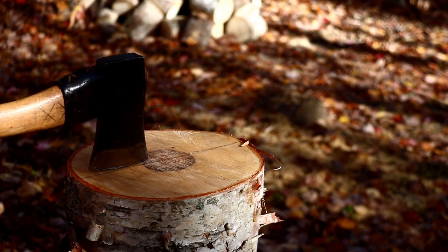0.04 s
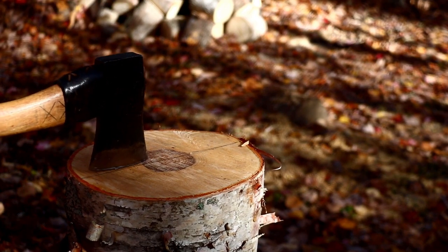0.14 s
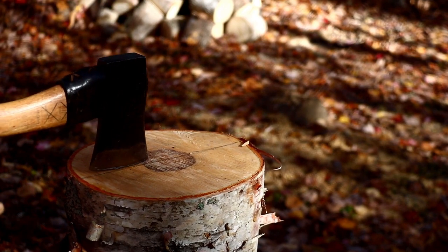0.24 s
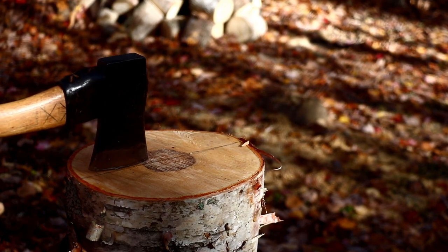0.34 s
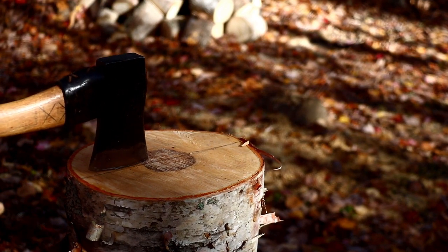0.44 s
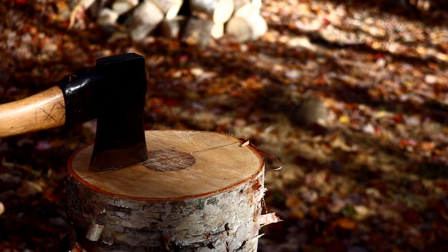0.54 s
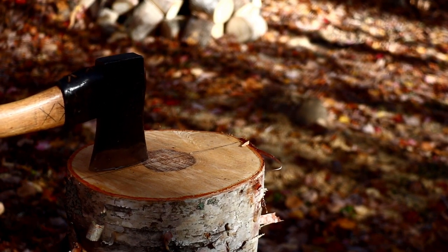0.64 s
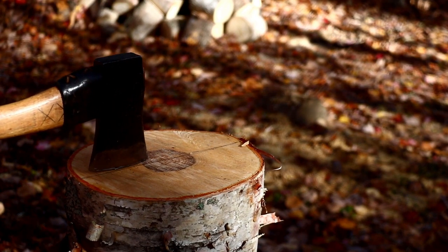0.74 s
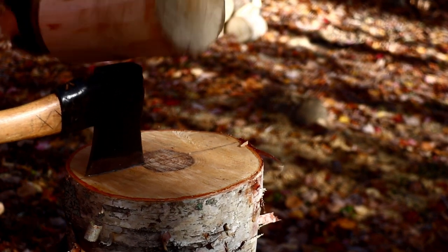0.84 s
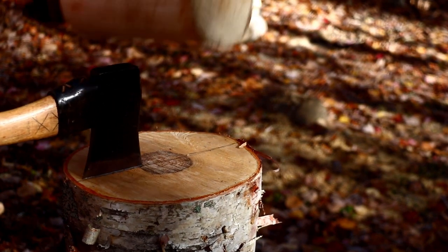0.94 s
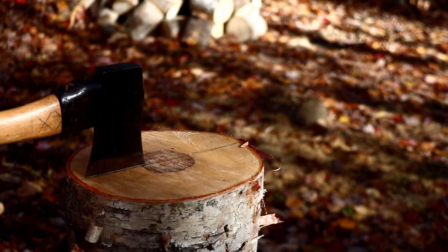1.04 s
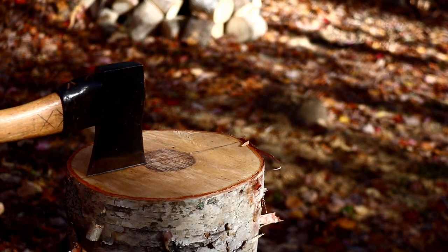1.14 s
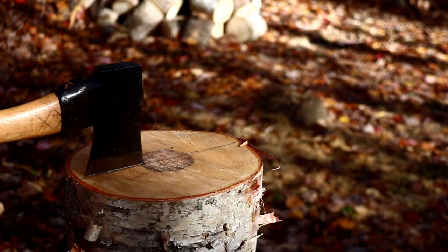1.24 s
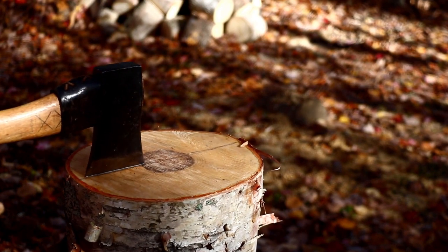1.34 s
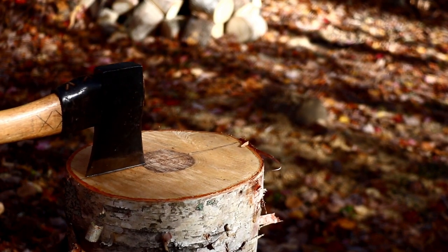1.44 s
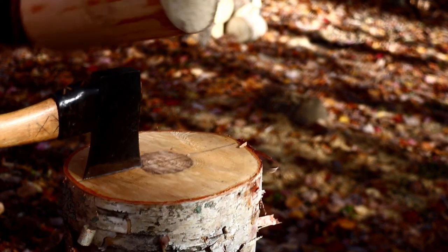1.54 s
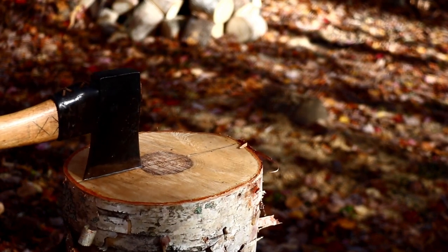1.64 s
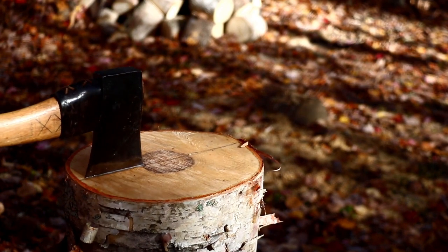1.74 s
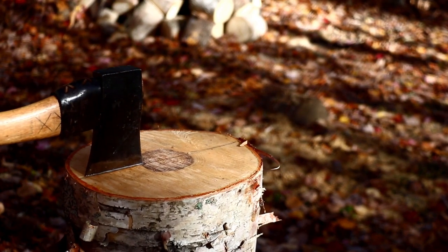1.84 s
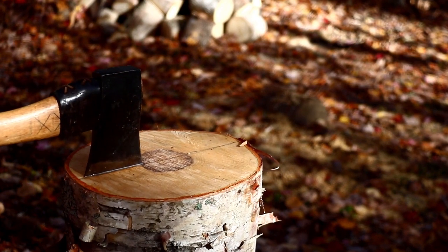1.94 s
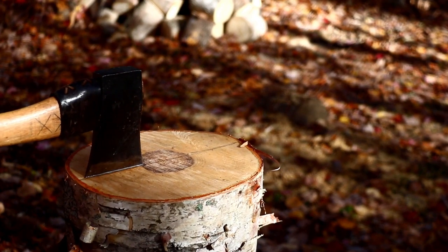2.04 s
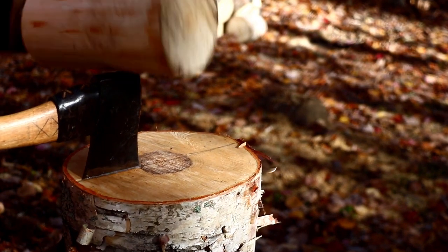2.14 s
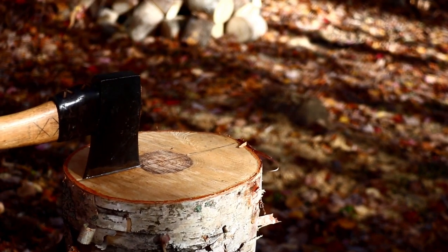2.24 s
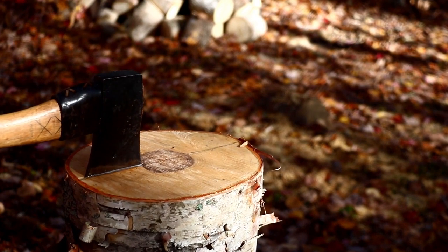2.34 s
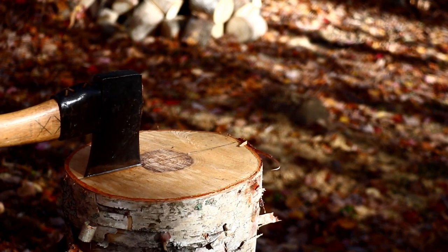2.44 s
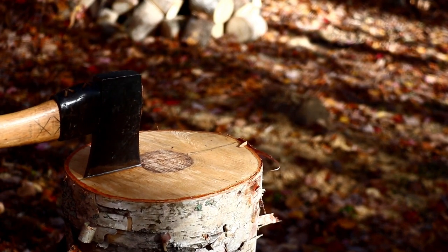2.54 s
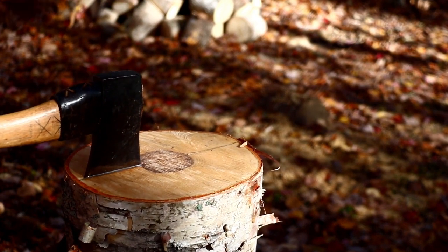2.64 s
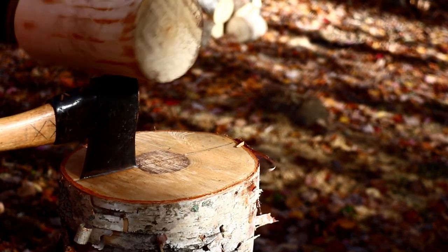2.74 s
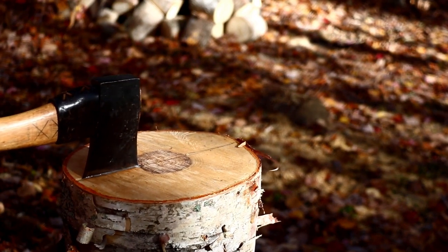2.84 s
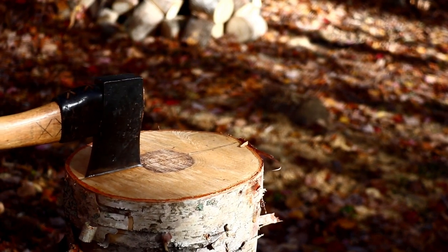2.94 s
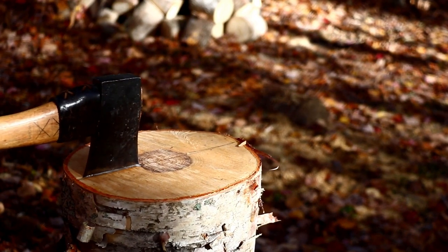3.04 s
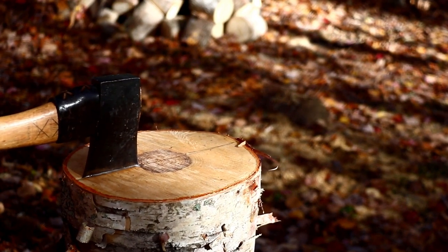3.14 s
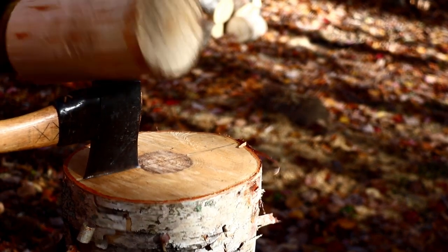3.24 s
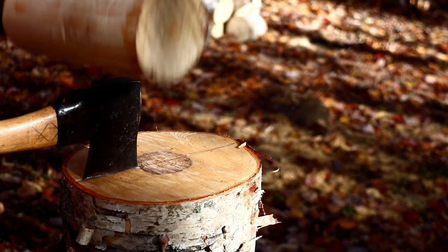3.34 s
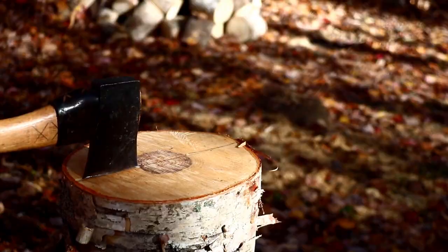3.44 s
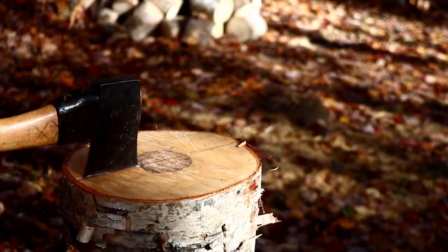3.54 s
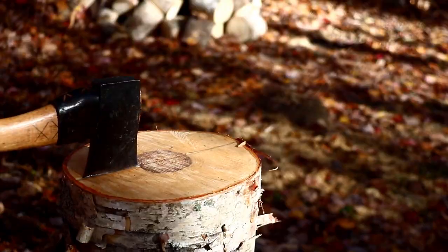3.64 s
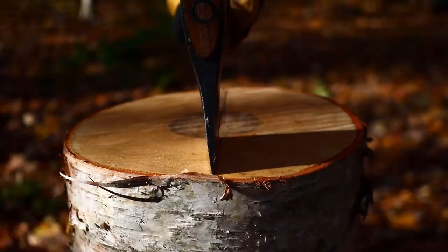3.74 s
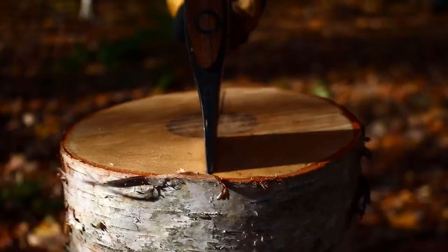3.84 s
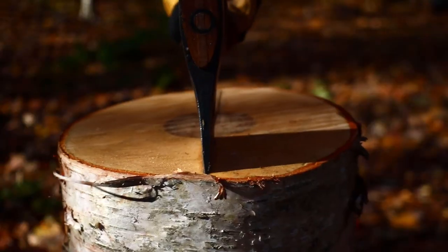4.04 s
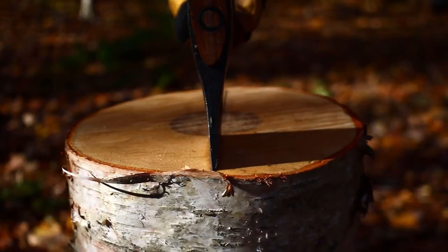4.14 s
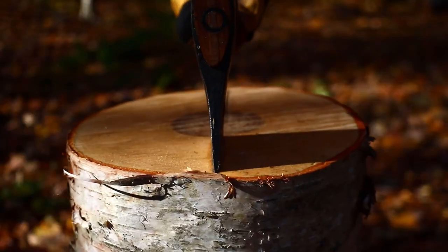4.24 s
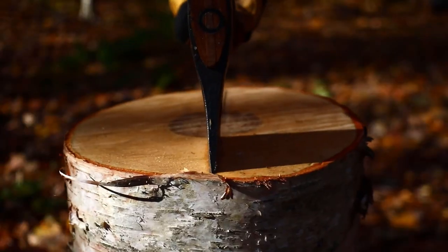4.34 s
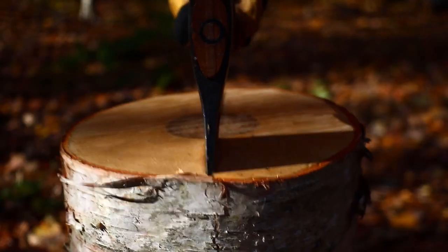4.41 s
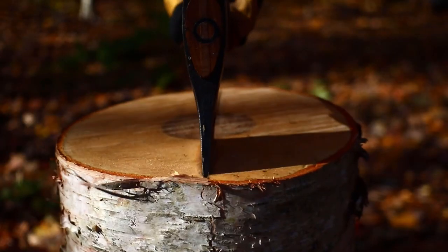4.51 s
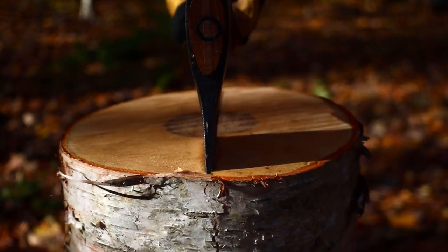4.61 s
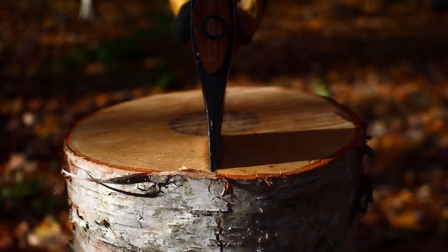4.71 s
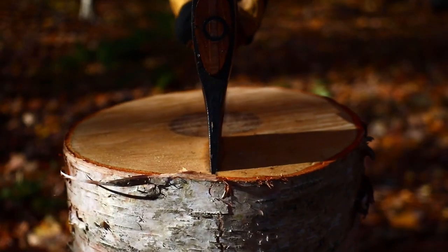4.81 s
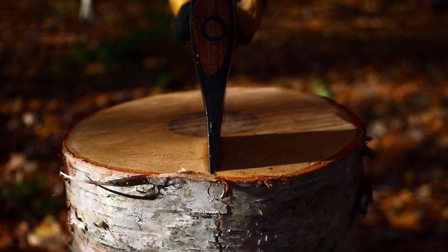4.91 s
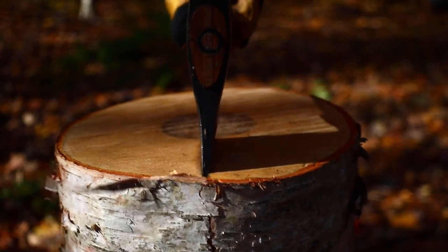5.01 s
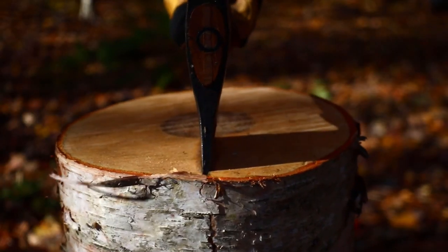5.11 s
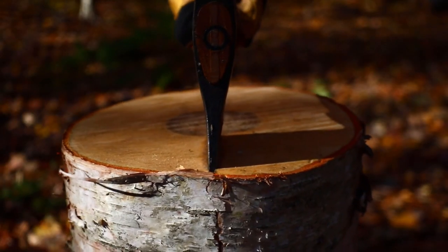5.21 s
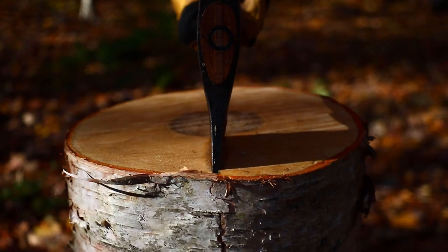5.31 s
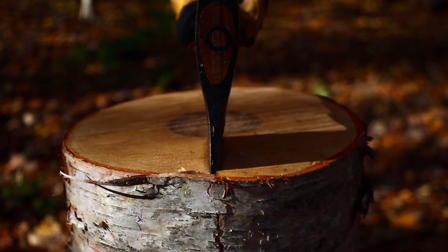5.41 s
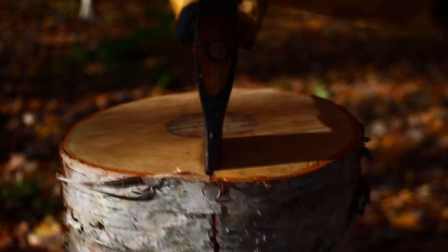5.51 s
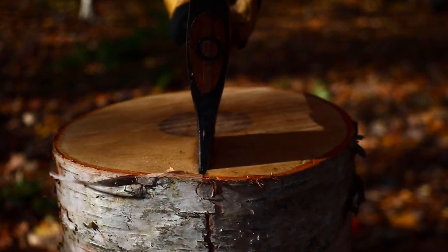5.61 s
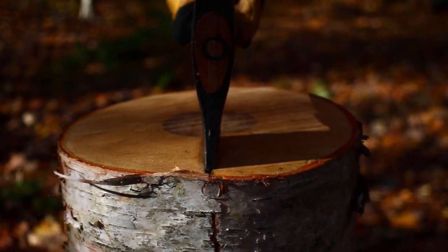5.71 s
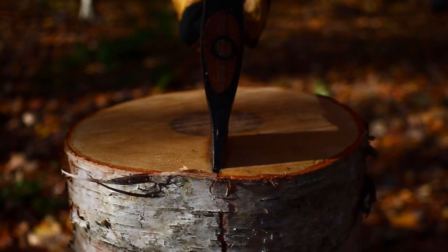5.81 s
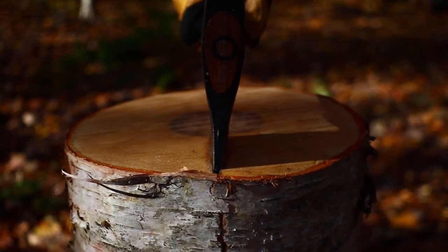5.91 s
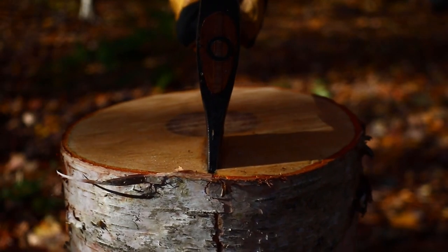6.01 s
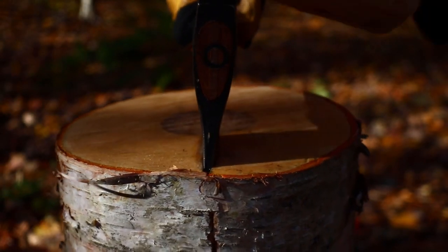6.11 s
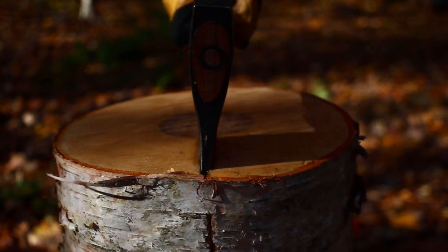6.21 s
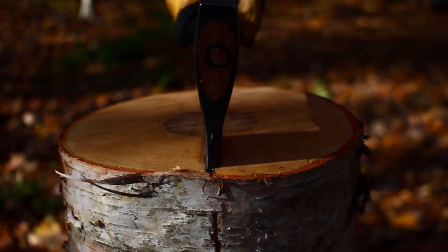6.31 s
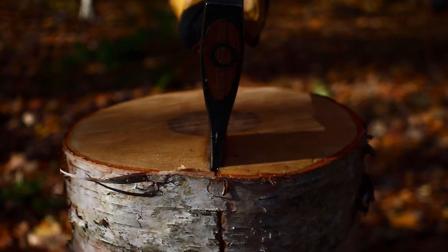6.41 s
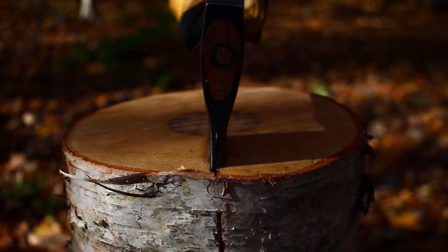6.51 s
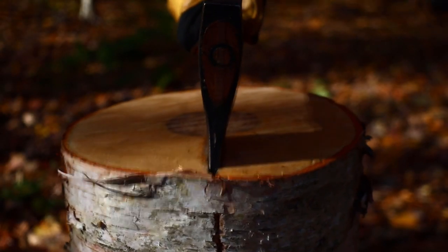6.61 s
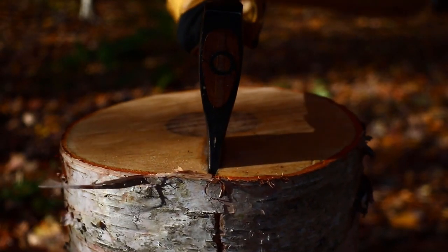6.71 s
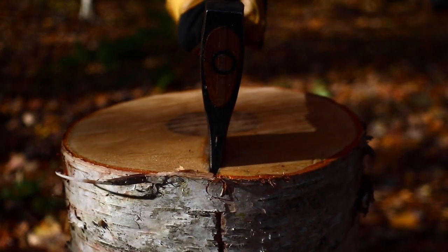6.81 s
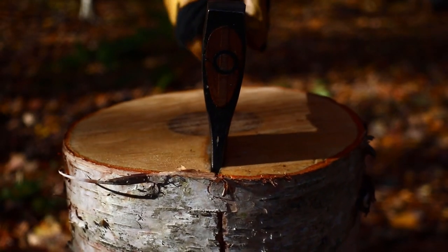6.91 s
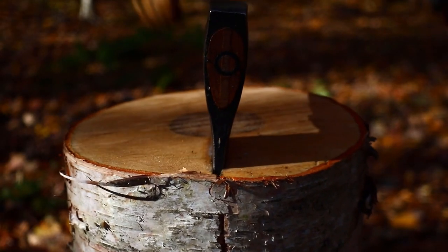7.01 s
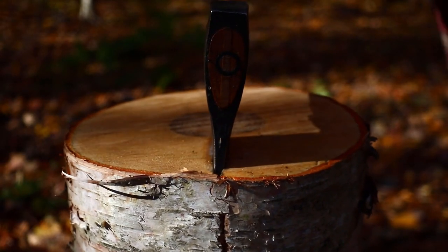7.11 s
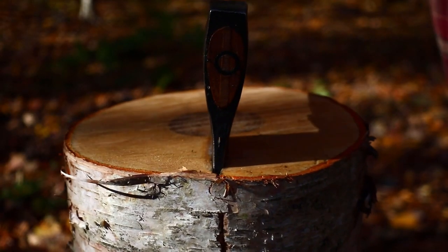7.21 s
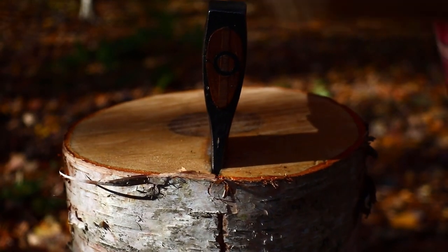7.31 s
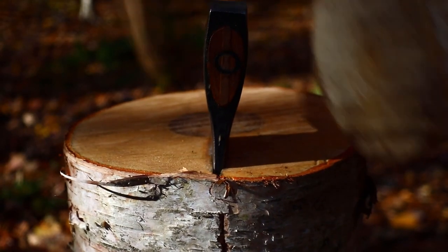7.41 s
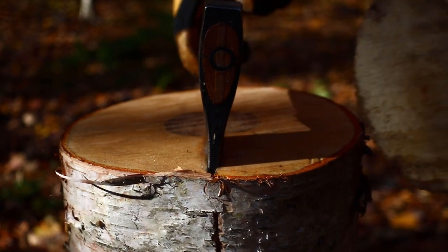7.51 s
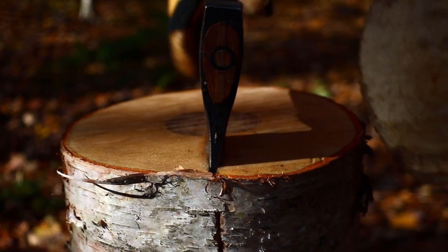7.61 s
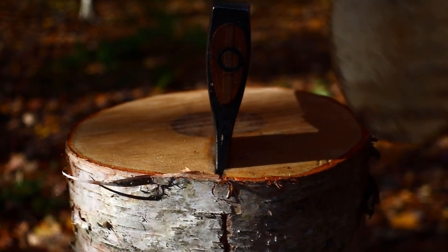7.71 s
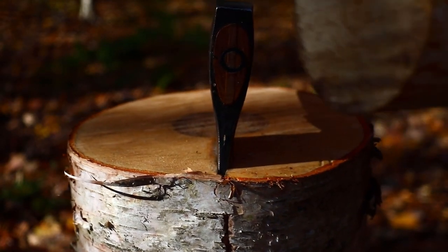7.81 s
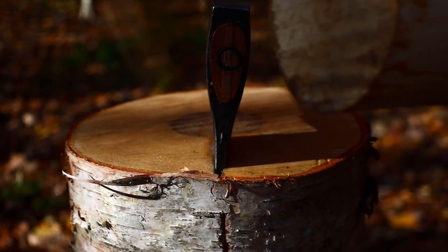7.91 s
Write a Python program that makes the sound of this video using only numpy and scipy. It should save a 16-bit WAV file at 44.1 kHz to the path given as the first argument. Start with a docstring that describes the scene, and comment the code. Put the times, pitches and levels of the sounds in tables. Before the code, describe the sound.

Quiet woods with soft hiss and a very faint, distant engine hum that swells and fades by 2.5 seconds. From 0.9 seconds a log used as a mallet strikes a hatchet into a birch round eleven times, about every 0.6 seconds, the last at 6.7. Each close, hard blow mixes a woody thump, a brief steel clink and cracking fibres, overloading the microphone. A low ground rumble and an echo from the trees trail for about a second. After the blow at 2.7 seconds, and those from 3.9 onward, the round drops back onto soil with a soft hollow bump and slight rattle. At 3.7 seconds the hiss abruptly grows louder and stays. Dry leaves tick faintly, mostly around 6.5 seconds. At 7.5 seconds comes a softer, short, dry woody knock with a few quick clicks, stopping without echo and leaving hiss.

```python
"""Autumn woods: a log used as a mallet drives a hatchet into a birch round with eleven hard blows.
Each blow rings the mallet, the round and the steel, tears fibres, shakes the ground and scatters back
from the trees; after the later ones the round rocks and lands. A last short, dry woody knock stops
abruptly without echo. Leaves tick and a far engine swells and fades. The close microphone overloads
on the blows; partway through it moves to a second position with more hiss."""
import sys
import numpy as np
from scipy import signal
from scipy.fft import rfft, irfft
from scipy.io import wavfile

SR = 44100
rng = np.random.default_rng(int(sys.argv[2]) if len(sys.argv) > 2 else 0)


def wav_record(signal):
    """Record a signal, one row per channel, as 16-bit PCM in the file named by sys.argv[1]."""
    frames = np.transpose(np.atleast_2d(signal))
    bounded = np.clip(frames, -1, 1)
    # unit amplitude maps onto the largest positive 16-bit level
    quanta = np.round(bounded * 32767).astype(np.int16)
    wavfile.write(sys.argv[1], SR, quanta)


N = 350595
T = np.arange(N) / SR
AGE = T[:SR]  # seconds since a hit, one second long
MIC_MOVE_S = 3.715

# the hits; at bite 0 the blade sticks and the round thumps, at 1 it drives in and tears the wood:
# start_s, bite, mallet_high_db, clink_db, round_pitch_ratio, hatchet_pitch_ratio
MALLET_HITS = [(0.8981, 0.06, 5.5, 0, 0.88, 0.94), (1.5663, 0.95, -14, -8, 1.11, 0.94),
               (2.1626, 0.81, 7, 7, 1.04, 0.94), (2.7466, 0.78, 9, 3, 1.05, 0.96),
               (3.3118, 0.29, 10.5, -10, 0.83, 0.82), (3.8807, 0.37, 13.5, 10.5, 1.02, 1.03),
               (4.4572, 0.93, 2, 17.5, 0.92, 0.99), (4.9995, 0.55, -2.5, 7.5, .95, 1.0),
               (5.5640, 0.16, 15, 7, 1.05, 1), (6.1396, 0.01, 6.5, 5.5, 1.06, 1.02),
               (6.6752, 0.25, 3.5, 10, 1.02, 1.015)]
# the mallet bends in two planes, low then high: pitch_hz, level_db, t60_s
MALLET_MODES = [(614.3, -1, 0.12), (679.3, -3, 0.086)]
# the body of the birch round: pitch_hz, level_db, t60_s
ROUND_MODES = [(109.7, -18.5, 0.072), (253, -16, 0.039), (334.7, 0.5, 0.033), (406.3, -3.5, 0.046),
               (466.8, 0, 0.042), (765.4, -8, 0.043)]
# the wedged hatchet, tuned by the grip of the wood: pitch_hz, level_db, t60_s
HATCHET_MODES = [(850.4, -14, 0.066), (955, -5.5, 0.035), (1025, 1, 0.047), (1177.7, -2.5, 0.033),
                 (1295, 0, 0.03), (1403, -5, 0.038), (1523.4, -2.5, 0.038), (1715, -5, 0.04),
                 (1877, -8.5, 0.043), (2090, -5.5, 0.026)]
# the clink of the steel head alone: pitch_hz, level_db, t60_s
HEAD_MODES = [(2395, -7.5, 0.04), (2475, 5, 0.025), (2620, -3, 0.027), (4145, -1.5, 0.019),
              (6240, -12, 0.022), (6630, -23, 0.034), (10550, -17.5, 0.011)]
# fibres tearing under the blade: band_hz, level_db, t60_s
CRACK_BANDS = [(153.3, -19, 0.035), (400, -3, 0.042), (1010, -2, 0.043), (2660, -8.5, 0.042),
               (4840, -15, 0.036), (6600, -13, 0.037), (10300, -18.5, 0.033), (16300, -17, 0.037)]
# the tail scattered by the trunks: band_hz, level_db, t60_s
ECHO_BANDS = [(98, -9, 0.31), (238, -15, 0.21), (423, -8.5, 0.83), (676, -3.5, 0.91), (1120, -0.5, 0.68),
              (1440, -6, 0.99), (2080, -13, 0.83), (2460, -8.5, 0.8), (3160, -12, 0.7), (7400, -12, 0.45),
              (11100, -21, 0.41), (15100, -21, 0.38)]
# the microphone stand's rumble at each position: pitch_hz, level_db, t60_s
FIRST_STAND_MODES = [(32, -34.5, 0.7), (52.2, -25, 0.51), (70, -28.5, 0.41)]
SECOND_STAND_MODES = [(32.8, -27.5, 0.8), (45.7, -21, 0.54), (78.1, -34, 0.55)]
# the round drops back on the ground: start_s, hollow_db, thud_db
ROUND_DROPS = [(2.791, -18, -13), (3.923, -30, -34), (4.495, -18, -12.5), (5.050, -10, -12.5),
               (5.611, -26, -16.5), (6.2107, -13, -16.5), (6.7098, -8, -10.5), (6.743, -14.5, -22)]
# the quick clicks of the last dry knock: start_s, ring_db, click_db, click_hz
KNOCK_CLICKS = [(7.467, -11, -4.5, 1400), (7.471, -2.5, -8, 4900), (7.476, -13.5, -18, 2500),
                (7.485, -16.5, -17.5, 2640), (7.502, -44, -28, 2200)]
# the woody tone of that knock: pitch_hz, level_db, t60_s
KNOCK_RING = [(310, 5.5, 0.033), (480, -2, 0.045), (620, 8, 0.05), (769, -4, 0.059), (923, 2, 0.044),
              (1180, 8, 0.014), (1594, -5, 0.039), (1812, -6.5, 0.066), (4230, -15, 0.039)]
# dry leaves and bark: start_s, level_db, centre_hz
LEAF_TICKS = [(0.380, -33.5, 2370), (3.213, -40.5, 1830), (6.44, -30, 1590), (6.46, -31.5, 2500),
              (6.501, -26, 2450), (6.507, -43, 3100), (7.338, -34, 11000)]
# the far engine's swell: time_s, pitch_hz, rms_db
ENGINE_CURVE = [(0, 52.7, -71), (0.6, 57, -57), (1.2, 58.2, -52), (1.95, 70.7, -58.5), (2.6, 70, -72)]
# the colour of the hiss at each position: frequency_hz, relative_db
FIRST_HISS = [(18, -53), (30, -12), (97, -2), (177, -9.5), (219, -8), (292, -8.5), (350, -2.5), (410, -8),
              (532, -7), (747, -11), (2300, -15), (6370, -17), (8280, -22.5), (15500, -31.5)]
SECOND_HISS = [(18, -39), (30, 1), (85, -10), (148, -2), (299, 0), (341, -1.5), (656, -0.5), (1050, -2.5),
               (1230, -3.5), (1820, -6), (2240, -4), (6210, -5), (13600, -21.5), (15500, -31)]


def blows(seated_after_blows=3.4, slap_delay_s=0.0625):
    """Mallet on steel: mallet, hatchet and round ring, the wood cracks and the trees answer."""
    out = np.zeros(N)
    for count, (start_s, bite, high_db, clink_db, round_pitch, hatchet_pitch) in enumerate(MALLET_HITS):
        # the microphone is side-on to the blade, then end-on
        low_db, hatchet_db = (5.6, 8.45) if start_s < MIC_MOVE_S else (-7, 5.25)
        seated = min(count / seated_after_blows, 1)  # the blade sinks with each blow until it is tight
        mallet = undb(low_db + 3.5 * bite) * ring(MALLET_MODES[:1])
        mallet += undb(high_db) * ring(MALLET_MODES[1:])
        hatchet = undb(hatchet_db + 7 * bite) * hatchet_ring(hatchet_pitch, seated)
        clink = undb(clink_db) * ring(HEAD_MODES)
        thump = undb(12.5 - 9 * bite) * ring(ROUND_MODES, round_pitch)
        crack = undb(6.5 + 5 * bite) * burst(CRACK_BANDS)
        echo = undb(-29 + 4.5 * bite) * tree_echo(bite, seated)
        tail = undb(-32 + 7 * bite - 5 * seated) * lingering_ring(hatchet_pitch)
        rumble = undb(4) * stand_rumble(start_s)
        add(out, start_s, mallet + hatchet + clink + thump + crack + echo + tail + rumble)
        # the nearest trunks return the hatchet's ring as one soft slap
        add(out, start_s + slap_delay_s, undb(-28) * hatchet * attack(0.0038))
    return out


def hatchet_ring(pitch, seated, overtones_above_hz=1600):
    """A loose blade rings dull; its overtones come up as the wood grips it."""
    dull_db = -8.5 * (1 - seated)
    modes = [(hz, db + dull_db * (hz > overtones_above_hz), t60) for hz, db, t60 in HATCHET_MODES]
    return ring(modes, pitch)


def tree_echo(bite, seated, presence_hz=1800, width_octaves=0.24):
    """Scatter from the trunks blooms and dies; bite adds treble and a seated blade adds presence."""
    hz, db, t60 = np.transpose(ECHO_BANDS)
    presence_db = np.interp(seated, [0, 1], [-23, 6])
    db = db + presence_db * np.exp(-(np.log2(hz / presence_hz) / width_octaves) ** 2)
    treble_db = -1 + 5.5 * bite
    db = db + treble_db * np.clip(np.log2(hz / 2000), 0, 1)
    return burst(np.column_stack([hz, db, t60]), grain=0.08) * attack(0.0054)


def lingering_ring(pitch, base_hz=1085, width_hz=90, t60_s=1.235):
    """The hatchet's note comes back from many trunks at once, as a narrow wavering tail."""
    hz = np.fft.rfftfreq(SR, 1 / SR)
    peak = 1 / (1 + ((hz - base_hz * pitch) / width_hz) ** 2)
    note = irfft(rfft(rng.standard_normal(SR)) * peak, SR)
    return note / note.std() * undb(-60 * AGE / t60_s) * attack(0.0098)


def stand_rumble(start_s):
    """The shock crosses the ground and sets the microphone stand swaying."""
    return ring(FIRST_STAND_MODES if start_s < MIC_MOVE_S else SECOND_STAND_MODES) * attack(0.014)


def landings(rattle_db=-5.5):
    """The round settles on soft soil with a hollow bump, and the hatchet rattles in it."""
    out = np.zeros(N)
    for start_s, hollow_db, thud_db in ROUND_DROPS:
        hollow = 1.98 * bandpass(ring(ROUND_MODES, rise_cycles=0.12), 405, 620)
        soil = bandpass(snap(260, decay_s=0.0089, rise_s=0.00082), 130, 490)
        rattle = 0.59 * ring(HATCHET_MODES) + 0.34 * ring(HEAD_MODES)
        rattle += 0.61 * snap(1600, decay_s=0.0044, rise_s=0.00078)
        thud = soil + undb(rattle_db) * rattle
        add(out, start_s, undb(hollow_db) * hollow + undb(thud_db) * thud)
    return out


def last_knock():
    """A short, dry woody knock with a few quick clicks; it stops without echo over a faint rumble."""
    out = np.zeros(N)
    for start_s, ring_db, click_db, click_hz in KNOCK_CLICKS:
        body = undb(ring_db - 10) * ring(KNOCK_RING)
        click = undb(click_db) * snap(click_hz, decay_s=0.003, rise_s=0.00041)
        add(out, start_s, body + click)
    first_s = KNOCK_CLICKS[0][0]
    add(out, first_s, undb(-9.5) * stand_rumble(first_s))
    return out


def leaves():
    """Dry leaves and bark rustle in small crisp ticks."""
    out = np.zeros(N)
    for start_s, level_db, centre_hz in LEAF_TICKS:
        add(out, start_s, undb(level_db) * snap(centre_hz, decay_s=0.0042, rise_s=0.00059))
    return out


def far_engine():
    """A low hum that climbs as the engine speeds up, then fades."""
    time_s, pitch_hz, rms_db = np.transpose(ENGINE_CURVE)
    cycles = np.cumsum(np.interp(T, time_s, pitch_hz)) / SR
    return np.sqrt(2) * undb(np.interp(T, time_s, rms_db)) * np.sin(2 * np.pi * cycles)


def background(crossfade_s=0.013):
    """Soft hiss and the engine at the first position; louder, slowly rising hiss at the second."""
    first = undb(-48) * coloured_noise(FIRST_HISS) + far_engine()
    second_db = np.interp(T, [MIC_MOVE_S, T[-1]], [-41.3, -40.3])
    second = undb(second_db) * coloured_noise(SECOND_HISS)
    moved = np.clip((T - MIC_MOVE_S) / crossfade_s + 0.5, 0, 1)
    return (1 - moved) * first + moved * second


def ring(modes, pitch=1, rise_cycles=0.43):
    """Struck modes; neighbours swing in opposite directions, and the low ones take longer to start."""
    out = 0
    for k, (hz, db, t60) in enumerate(modes):
        cycles = hz * pitch * AGE
        envelope = undb(db - 60 * AGE / t60) * (1 - np.exp(-cycles / rise_cycles))
        out = out + (-1) ** k * envelope * np.sin(2 * np.pi * cycles)
    return out


def burst(bands, grain=0):
    """Noise that dies at its own rate in each band; grain roughens it like separate reflections."""
    hz, db, t60 = np.transpose(bands)
    log_hz = np.log(np.maximum(np.fft.rfftfreq(SR, 1 / SR), 1))
    noise = rng.standard_normal(SR)
    flicker = np.repeat(rng.standard_normal(SR), 64)[:SR]
    spectrum = rfft(noise * np.exp(grain * flicker))
    out = 0
    for k, share in enumerate(np.eye(len(hz))):
        band = irfft(spectrum * np.interp(log_hz, np.log(hz), share, left=0), SR)
        out = out + band / band.std() * undb(db[k] - 60 * AGE / t60[k])
    return out


def snap(hz, decay_s, rise_s):
    """A short crisp noise, two octaves wide."""
    noise = bandpass(rng.standard_normal(SR), hz / 2, hz * 2)
    return noise / noise.std() * np.exp(-AGE / decay_s) * attack(rise_s)


def coloured_noise(curve):
    """A bed of noise shaped by an EQ curve, at unit rms."""
    hz, db = np.transpose(curve)
    log_hz = np.log(np.maximum(np.fft.rfftfreq(N, 1 / SR), 1))
    eq = undb(np.interp(log_hz, np.log(hz), db))
    noise = irfft(rfft(rng.standard_normal(N)) * eq, N)
    return noise / noise.std()


def bandpass(sound, low_hz, high_hz):
    """Gently roll off the lows and highs."""
    sos = signal.butter(1, [low_hz, min(high_hz, 0.45 * SR)], "band", fs=SR, output="sos")
    return signal.sosfilt(sos, sound)


def attack(rise_s):
    """A fade-in that softens the front of a hit."""
    return 1 - np.exp(-AGE / rise_s)


def undb(db):
    """Decibels to gain."""
    return 10 ** (np.asarray(db) / 20)


def add(track, start_s, sound):
    """Mix a sound into the track at its cue."""
    i = int(start_s * SR)
    track[i:i + len(sound)] += sound[:N - i]


def scene():
    """The mono mix at the close microphone."""
    return (blows() + landings() + last_knock() + leaves() + background())[None]


def record(dry, top_hz=16000):
    """The input clips flat, lower at the second position, and the top end is cut."""
    ceiling = np.where(T < MIC_MOVE_S, 0.94, 0.72)
    clipped = np.clip(dry, -ceiling, ceiling)
    return signal.sosfiltfilt(signal.butter(16, top_hz, fs=SR, output="sos"), clipped)


dry = scene()
out = record(dry)
wav_record(out)
```